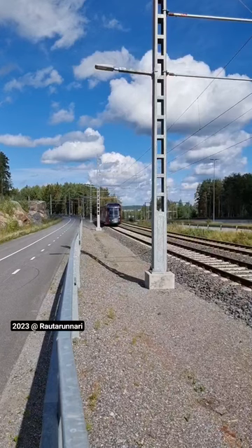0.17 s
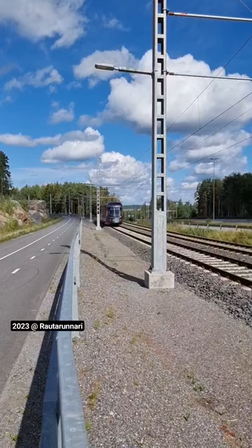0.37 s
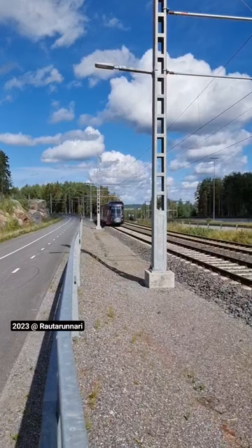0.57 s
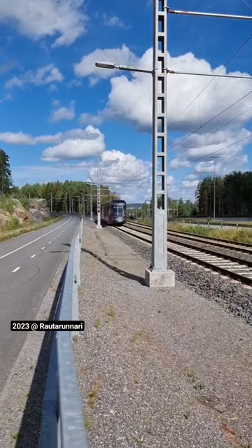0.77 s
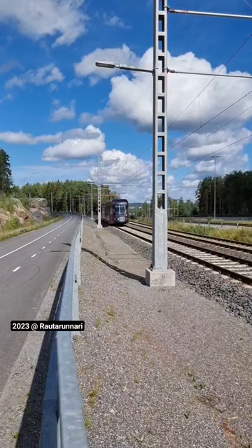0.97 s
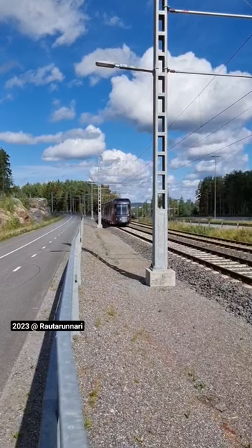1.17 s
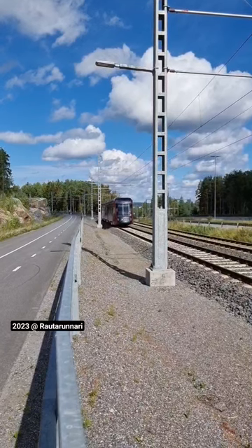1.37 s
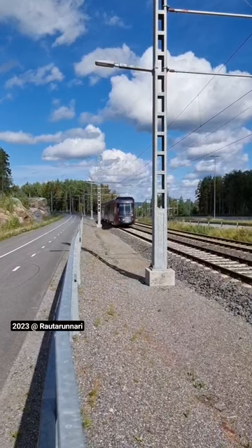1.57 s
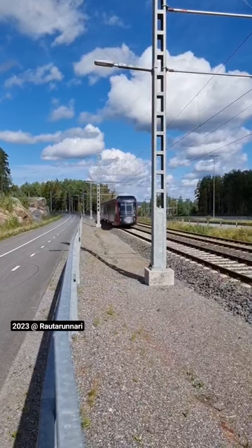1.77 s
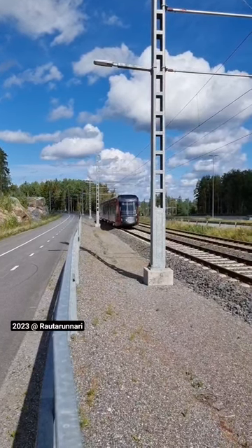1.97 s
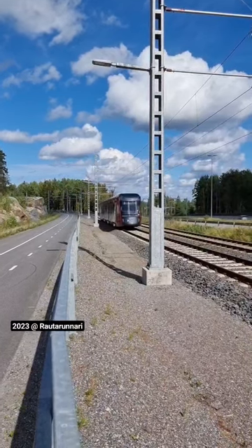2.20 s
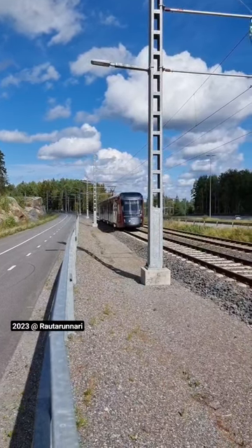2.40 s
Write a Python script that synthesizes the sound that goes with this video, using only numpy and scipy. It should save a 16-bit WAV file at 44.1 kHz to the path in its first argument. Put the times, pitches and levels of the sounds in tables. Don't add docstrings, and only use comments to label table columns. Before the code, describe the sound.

Tram rolling nearer outdoors, still some way off, with rough steel-on-steel roar and thin ringing over airy hiss; low wind gusts and sharp pops hit the handheld stereo microphone, and the roar swells near the end.

```python
import sys
import numpy as np
from scipy import signal
from scipy.fft import rfft, irfft
from scipy.io import wavfile
from scipy.ndimage import uniform_filter1d

SR = 44100
rng = np.random.default_rng(int(sys.argv[2]) if len(sys.argv) > 2 else 0)


def convert_level_to_amplitude(level_db):
    exponent = np.asarray(level_db, float) / 20
    return 10 ** exponent


def wrap_up_sound(samples):
    columns = np.atleast_2d(samples).T
    tamed = np.clip(columns, -1, 1)
    steps = np.round(tamed * 32767).astype(np.int16)
    wavfile.write(sys.argv[1], SR, steps)


N = 112014
COARSE_STEP = 32
SECONDS = np.arange(N) / SR
COARSE_S = SECONDS[::COARSE_STEP]
HZ = np.fft.rfftfreq(N, 1 / SR) + 1e-3
SIDES = np.array([[.5], [-.5]])


def rms_one(x):
    return x / np.sqrt(np.mean(x ** 2) + 1e-20)


def filled(coarse):
    return np.array([np.interp(SECONDS, COARSE_S, row) for row in np.atleast_2d(coarse)])


def drift(rate_hz):
    points = 4096
    hz = np.fft.rfftfreq(points, COARSE_STEP / SR)
    spectrum = rfft(rng.standard_normal(points)) / (1 + (hz / rate_hz) ** 2)
    slow = irfft(spectrum * (hz > .5))
    return rms_one(np.interp(np.arange(N) / COARSE_STEP, np.arange(points), slow))


def pair(alike, phase_rad):
    real, imaginary = rng.standard_normal((2, 3, len(HZ)))
    common, *own = real + 1j * imaginary
    alike = np.clip(alike, 0, 1)
    shared = np.sqrt(alike) * common * np.exp(1j * phase_rad * SIDES)
    return shared + np.sqrt(1 - alike) * np.array(own)


def hump(hz, width_hz):
    return 1 / (1 + ((HZ - hz ** 2 / HZ) / width_hz) ** 4) ** .5


def evened(x, slack=0.035):
    span = int(.016 * SR)
    power = uniform_filter1d(uniform_filter1d(x ** 2, span), span)
    return x / np.sqrt(power + slack * np.mean(x ** 2))


def band_noise(alike, phase_rad, hz, width_hz, slack=0.035):
    return evened(irfft(pair(alike, phase_rad) * hump(hz, width_hz), N), slack)


# f/Hz, density/dB per Hz
HISS_COLOUR = [(300, -8.5), (700, -0.5), (1800, -12), (2400, -12), (3600, -18), (6000, -22), (10000, -24),
               (15500, -27)]


def hiss():
    level_db, growth_db_per_s, tilt_db = -53, 1.5, -1
    hz, db = np.transpose(HISS_COLOUR)
    colour_db = np.interp(np.log(HZ), np.log(hz), db) + tilt_db * SIDES * HZ / 5000
    colour = convert_level_to_amplitude(colour_db) / np.sqrt(1 + (200 / HZ) ** 4)
    gain = convert_level_to_amplitude(level_db + growth_db_per_s * SECONDS + 0.65 * drift(26))
    return gain * rms_one(irfft(pair(0.059, 0.) * colour, N))


def puffs(rows, floor_db):
    power = convert_level_to_amplitude(2 * floor_db)
    for s, length_s, db, pan_db in rows:
        bell = np.exp(-3.7 * ((COARSE_S - s) / length_s) ** 2)
        power = power + convert_level_to_amplitude(2 * (db + pan_db * SIDES)) * bell
    return filled(np.sqrt(power))


# centre t/s, length/s, level/dB, left-right/dB
GUSTS = [(.185, 0.054, -35, 6), (.305, 0.1, -34.5, -3), (.482, 0.037, -43.5, -4),
         (.562, 0.027, -43.5, -12.5), (.668, 0.051, -33, -4.5), (.82, 0.092, -34, -2.5),
         (.896, 0.067, -39.5, 0.5), (.97, 0.055, -39.5, -2.5), (1.05, 0.029, -30, -1),
         (1.10, 0.038, -33.5, -2), (1.175, 0.045, -34.5, -1), (1.272, 0.08, -28, 1), (1.40, 0.2, -35, 3.5),
         (1.51, 0.099, -27.5, -1), (1.575, 0.055, -33.5, -2), (1.67, 0.094, -42, 1), (1.775, 0.075, -32, 1),
         (1.873, 0.054, -41, -2), (1.975, 0.055, -32, -6.5), (2.05, 0.06, -33.5, 4), (2.17, .05, -39, -2),
         (2.25, 0.28, -38.5, 2.5), (2.306, 0.092, -31.5, 1), (2.42, 0.13, -35, -6), (2.505, 0.084, -32, 2)]
# f/Hz, width/Hz, level/dB
GUST_BANDS = [(41, 19, -3.5), (63.9, 29.6, 5.5), (78.4, 27.7, 1), (107.4, 40, -3)]


def gusts():
    breeze_db, ports_alike = -53.5, 0.54
    deep = 0
    for hz, width_hz, db in GUST_BANDS:
        deep = deep + convert_level_to_amplitude(db) * band_noise(ports_alike, 1.0, hz, width_hz)
    return rms_one(deep) * puffs(GUSTS, breeze_db)


# centre t/s, length/s, level/dB, left-right/dB, brightness/dB per octave
BUFFETS = [(0.184, 0.03, -44, -2, -13.5), (0.259, .03, -48, 1, -12), (0.344, 0.051, -46, 0, -1),
           (0.572, 0.029, -46, 12, 2), (.69, 0.12, -50, -3.5, 9), (0.823, 0.05, -45, -7, 3),
           (0.89, 0.03, -39.5, 2, 1), (1.09, 0.033, -41, 2, -5.5), (1.157, 0.028, -43.5, 2, -7),
           (1.27, 0.047, -24.5, -2, 3), (1.357, 0.026, -45.5, -1.5, -18.5), (1.41, 0.018, -37, 7, 1.5),
           (1.495, 0.034, -38, -1, -3), (1.517, 0.018, -31, -6.5, 1.5), (1.672, 0.019, -47, -11, -7),
           (1.783, 0.045, -39, -1.5, -3.5), (1.919, 0.02, -44.5, 1, -2), (2.032, 0.024, -38, -1.5, 1.5),
           (2.083, 0.012, -44, 0, 10), (2.175, 0.05, -43, -1, 5), (2.255, 0.025, -35.5, 1, 4),
           (2.411, 0.072, -35.5, -0.5, -3), (2.532, .033, -37.5, 1, -8)]
# f/Hz, width/Hz, level/dB
BUFFET_BANDS = [(146.3, 68.5, 1.5), (237.5, 64, -3.5), (315.5, 97, -5.5), (475, 200, -14.5), (525, 82, -21)]


def buffets():
    flutter_db, ports_alike = -53.5, 0.37
    out = 0
    for hz, width_hz, band_db in BUFFET_BANDS:
        octaves = np.log2(hz / 230)
        rows = [(s, length_s, db + tilt * octaves, pan_db) for s, length_s, db, pan_db, tilt in BUFFETS]
        noise = band_noise(ports_alike, hz / 120, hz, width_hz)
        out = out + convert_level_to_amplitude(band_db - 2.0) * noise * puffs(rows, flutter_db)
    return out


# t/s, left peak/dB, right peak/dB, f/Hz
POPS = [(0.1914, -26, -28, 75), (0.202, -27, -29.5, 79), (.258, -27, -27, 85.5), (0.306, -27, -47, 91),
        (0.893, -21.5, -39, 93), (0.888, -41, -22, 86), (1.102, -23.5, -24.5, 100),
        (1.1656, -27.5, -35, 103), (1.227, -33, -22.5, 90), (1.241, -24, -46, 75),
        (1.2536, -30, -15.5, 117), (1.262, -17, -12.5, 95), (1.2752, -14, -17, 95),
        (1.2821, -45, -19.5, 196), (1.289, -21, -16, 108), (1.3025, -30, -28, 169),
        (1.415, -29.5, -31, 204), (1.5044, -13, -31, 196), (1.5122, -25.5, -53, 403),
        (1.5155, -36, -14, 224), (1.7764, -24, -24.5, 103), (2.034, -38, -25, 102.3),
        (2.2538, -22.5, -41, 133), (2.2845, -29, -24, 75), (2.326, -27, -36, 71.8), (2.416, -24, -42, 110),
        (2.459, -25, -28, 89.8), (2.475, -28, -29, 60), (2.501, -23, -24, 90), (2.5278, -24, -34, 130)]


def pops():
    out = np.zeros((2, N))
    for s, left_db, right_db, hz in POPS:
        near = slice(int((s - .03) * SR), min(int((s + .03) * SR), N))
        cycles = (SECONDS[near] - s) * hz
        slap = np.cos(2 * np.pi * cycles) * np.exp(-3.1 * cycles ** 2)
        out[:, near] += convert_level_to_amplitude(np.array([[left_db], [right_db]])) * slap
    return out


# t/s, length/s, f/Hz, level/dB, reach/octaves
FLARES = [(.22, 0.17, 1100, -9, 0.13), (.615, .046, 1040, 4.5, .1), (0.73, 0.06, 1390, 9, 0.09),
          (0.77, 0.19, 1120, 6.5, .08), (0.3, 0.023, 1600, 6, 0.055), (1.08, 0.13, 1700, 3, 0.062),
          (1.18, 0.075, 1085, 5.5, 0.065), (1.33, 0.051, 1070, -5, .08), (1.397, .08, 1030, 6, .06),
          (2.0, 0.15, 2050, 5.5, .08), (2.53, .05, 1120, -4, .1), (1.657, .16, 1060, 3, .08),
          (2.03, 0.071, 1100, 1.5, 0.089), (2.044, .04, 1040, 6.5, .08), (2.126, 0.049, 1230, 8, 0.077),
          (2.18, 0.027, 1074, 13, 0.053), (2.202, 0.058, 1260, 8, 0.079), (2.241, .06, 1770, 13, .05),
          (2.337, 0.077, 1750, 3, 0.065), (2.35, 0.036, 1350, 11, .05), (2.407, 0.11, 1415, -14, 0.18),
          (2.4, 0.13, 1050, -3, 0.11), (2.474, 0.046, 1680, 11, 0.035), (2.534, 0.036, 1230, 7.5, 0.37),
          (.35, .25, 4300, 5.5, 0.6), (2.49, 0.22, 2900, 0, .1), (.78, 0.22, 3060, -18, 0.45),
          (1.9, 0.98, 4150, 0, .1), (2.43, .06, 3020, 7.5, 0.11), (.3, 0.041, 1070, 6, .06),
          (.69, 0.031, 1100, 7.5, .06), (.57, 0.049, 1200, 4, .06), (.7, 0.076, 700, 1.5, 0.58),
          (1.55, 0.15, 2900, 1, .1), (2.2, 0.11, 2900, -4, .1)]


def resonances(rows, alike, patchy_db):
    out = 0
    for hz, width_hz, db, pan_db, phase_rad in rows:
        flare_db = 0
        for s, length_s, near_hz, lift_db, reach in FLARES:
            time_off = 2 * (COARSE_S - s) / length_s
            pitch_off = np.log2(hz / near_hz) / reach
            flare_db = flare_db + lift_db * np.exp(-time_off ** 2 - pitch_off ** 2)
        swell = convert_level_to_amplitude(filled(flare_db) + patchy_db * drift(16.0))
        ring = band_noise(alike, phase_rad, hz, width_hz, slack=.15) * np.sqrt(width_hz)
        out = out + convert_level_to_amplitude(db + pan_db * SIDES) * swell * ring
    return rms_one(out)


# f/Hz, width/Hz, level/dB, left-right/dB, left phase lead/rad
WHEEL = [(2844, 56, 2, 4, -1.8), (2917, 184, -3.5, 0, -0.5), (3360, 180, -11, 12, 6),
         (4064, 47, -3, 2, 5.5), (4214, 120, -6, -5.5, 3), (5130, 330, -13, -5, 2),
         (5520, 28, -9.5, 8, 4.5), (6350, 78, -12, -14, -2), (6890, 100, -14.5, 16, 3.5),
         (7110, 53, -7, 7, 2.)]


def wheel():
    level_db, growth_db_per_s = -66, 3.5
    ring = resonances(WHEEL, alike=0.44, patchy_db=3)
    return ring * convert_level_to_amplitude(level_db + growth_db_per_s * SECONDS)


# f/Hz, width/Hz, level/dB, left-right/dB, left phase lead/rad
RAIL = [(304, 45, -10.5, -3.5, 3.5), (547, 86, -13.5, 2, -4), (610.6, 58, -10, -4, 0.1),
        (899, 270, -10.5, -6.5, -0.5), (1044, 109, -5.5, -7, -2), (1065, 30.4, 0, -11.5, -2.5),
        (1238, 109, -5.5, -4.5, 1.14), (1347, 51, -3.5, -2, -0.07), (1563, 167, -7.5, -9.5, 0.64),
        (1678, 47, -3, -5.5, -0.85), (1750.5, 59, -3.5, -1.5, 0.53), (1956, 62, -11.5, 3, -0.5),
        (2043, 62, -14.5, 5, -0.26), (2210, 50, -21.5, 10, 1.6)]
# t/s, level/dB
APPROACH = [
    (.16, -42.5),
    (.45, -42.5),
    (.62, -40.5),
    (.95, -41),
    (1.4, -40.5),
    (1.85, -40),
    (2.2, -38.5),
    (2.38, -40),
    (2.54, -39),
]


def rail():
    roar = resonances(RAIL, alike=0.73, patchy_db=2)
    roar_db = np.interp(SECONDS, *np.transpose(APPROACH)) + 2.26 + 1.0 * drift(21)
    return roar * convert_level_to_amplitude(roar_db)


def scene():
    return hiss() + gusts() + buffets() + pops() + wheel() + rail()


# f/Hz, width/Hz, threshold/spreads (lower = more often)
MUTED = [(8160, 360, 0.25), (8500, 280, 0.55), (9260, 260, -0.18), (9700, 300, 1.5), (10930, 220, -0.92),
         (11320, 680, -1), (11600, 250, 0.72), (12040, 480, 0.55), (13000, 400, 1.6), (14200, 300, 1.1),
         (15400, 420, -.2)]


def muted(x):
    rate_hz, from_s = 14, .25
    spectrum = rfft(x)
    for hz, width_hz, spreads in MUTED:
        spells = (drift(rate_hz) > spreads) * (SECONDS > from_s)
        shut = uniform_filter1d(1. * spells, size=700)
        x = x - shut * irfft(spectrum * (abs(HZ - hz) < width_hz / 2), N)
    return x


def ducked(x):
    from_db, share, window_s = -32, 0.41, 0.066
    power = uniform_filter1d(np.mean(x ** 2, axis=0), int(window_s * SR))
    level_db = 10 * np.log10(power + 1e-12)
    middle = irfft(rfft(x) * hump(870, 710), N)
    return x + middle * (convert_level_to_amplitude(-share * np.maximum(level_db - from_db, 0)) - 1)


def opened(x):
    open_s, fade_s = 0.1415, 0.016
    warm_s, warm_ramp_s, warm_db = 0.25, 0.026, -4
    top = irfft(rfft(x) * (HZ > 7000), N)
    dullness = np.clip((warm_s - SECONDS) / warm_ramp_s, 0, 1)
    x = x + top * (convert_level_to_amplitude(warm_db * dullness) - 1)
    return x * np.clip((SECONDS - open_s) / fade_s + 1, 0, 1) ** 3


def low_pass(x):
    return signal.sosfilt(signal.butter(12, 15600, fs=SR, output="sos"), x)


def record(dry):
    cutoff_hz, rumble_cut_hz = 15550, 22
    response = (HZ < cutoff_hz) / np.sqrt(1 + (rumble_cut_hz / HZ) ** 6)
    x = muted(irfft(rfft(dry) * response, N))
    return low_pass(opened(ducked_before_opening(x)))


def ducked_before_opening(x):
    return ducked(x)


dry = scene()
out = record(dry)
wrap_up_sound(out)
```